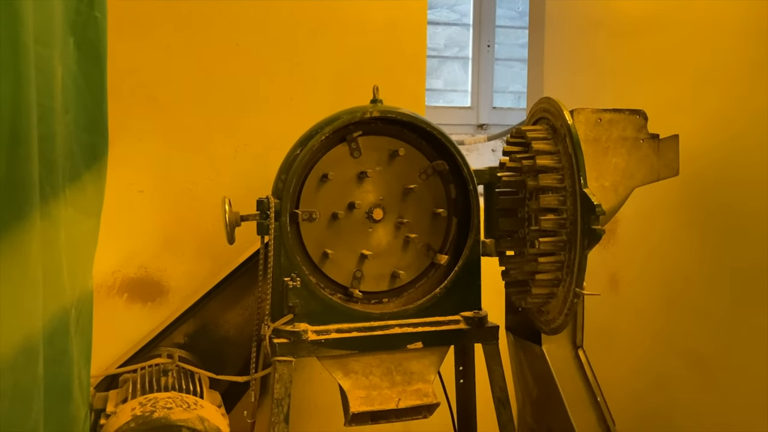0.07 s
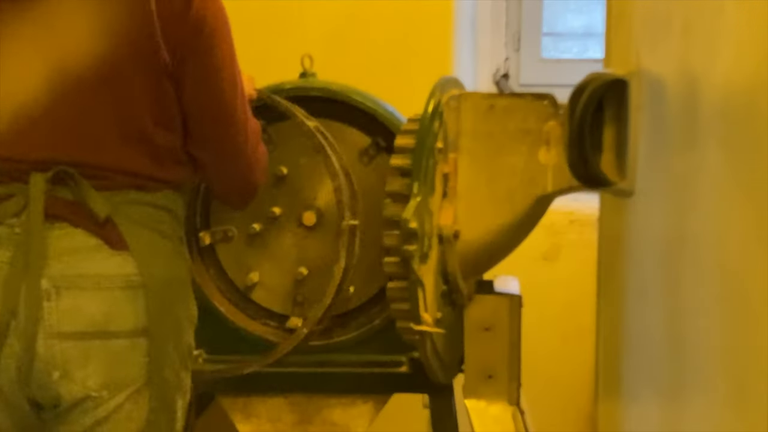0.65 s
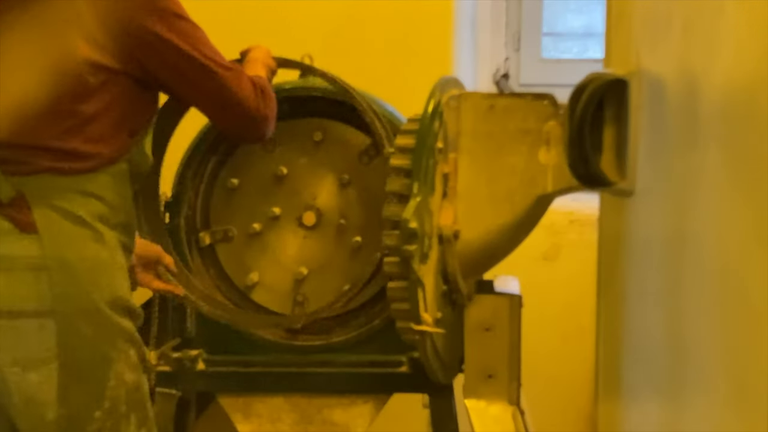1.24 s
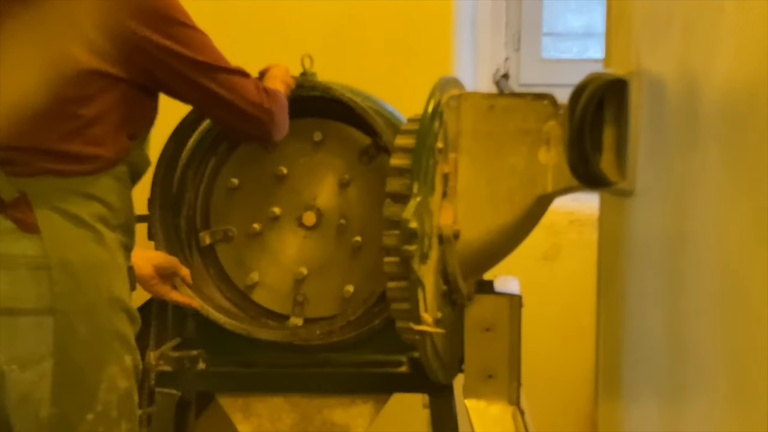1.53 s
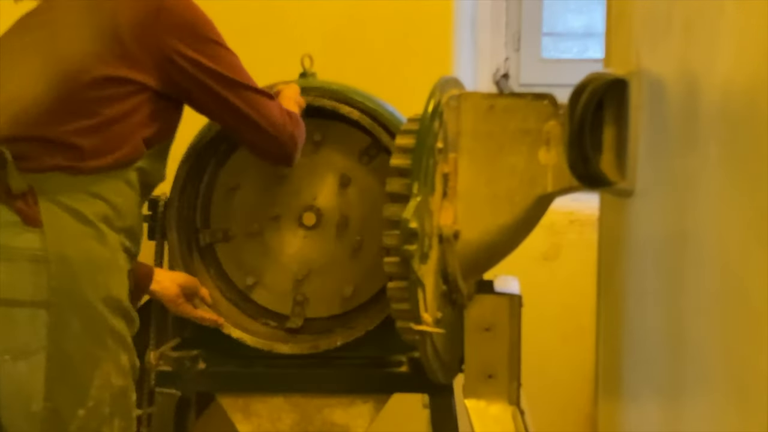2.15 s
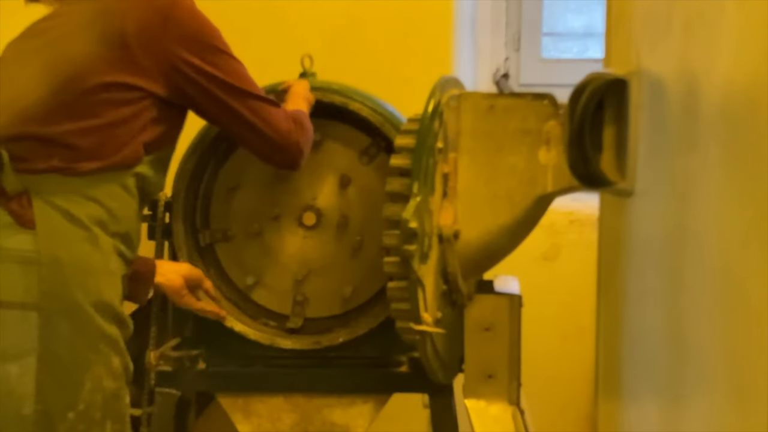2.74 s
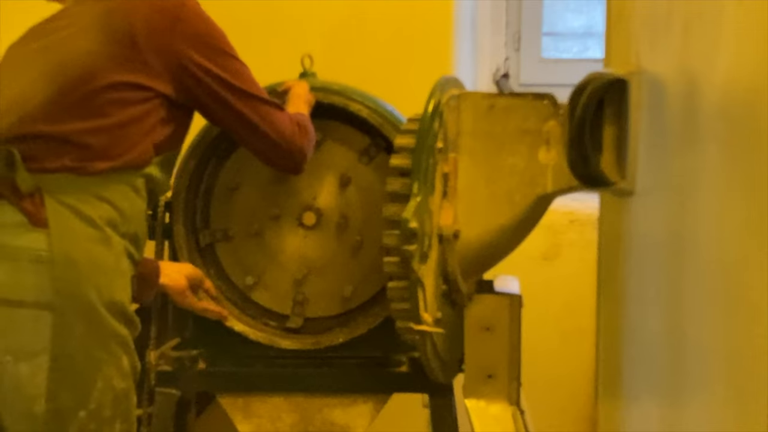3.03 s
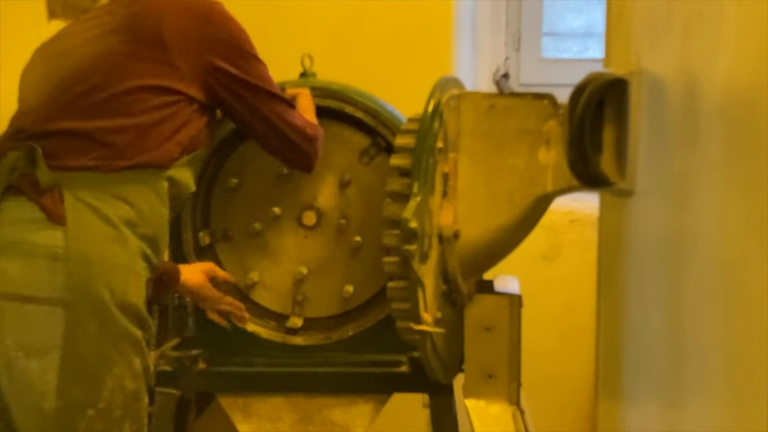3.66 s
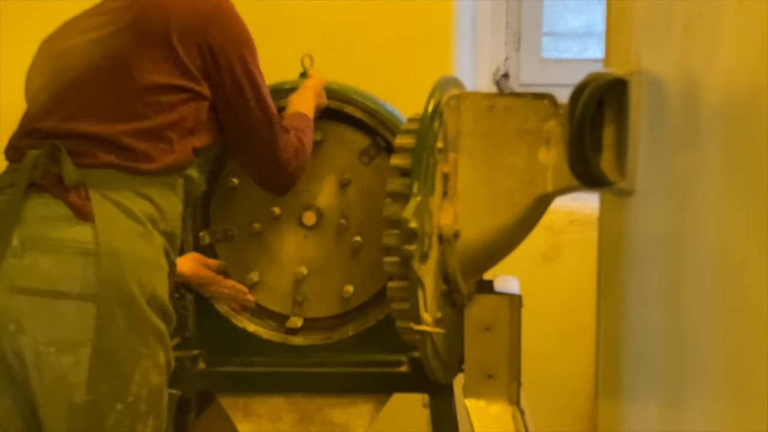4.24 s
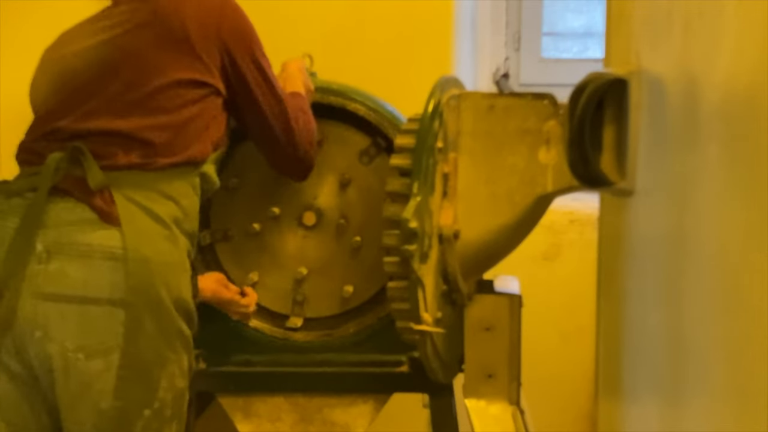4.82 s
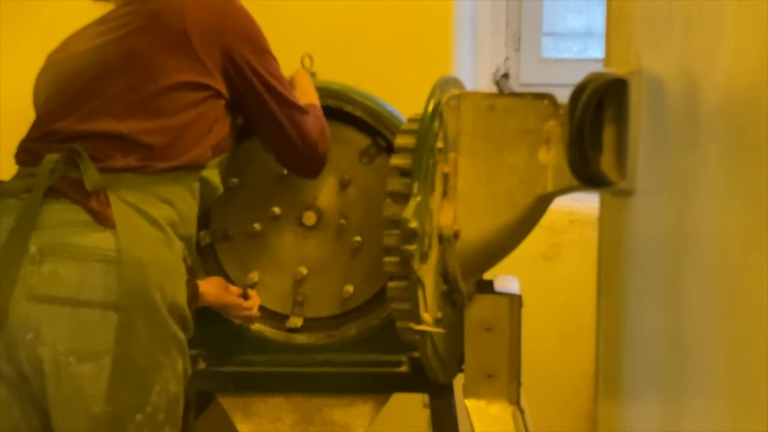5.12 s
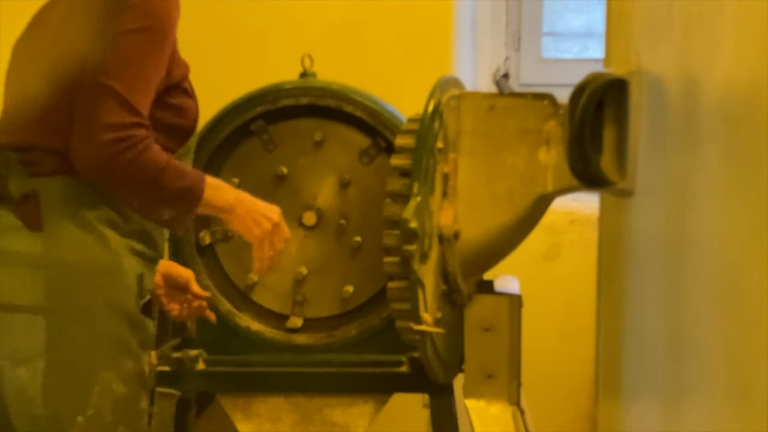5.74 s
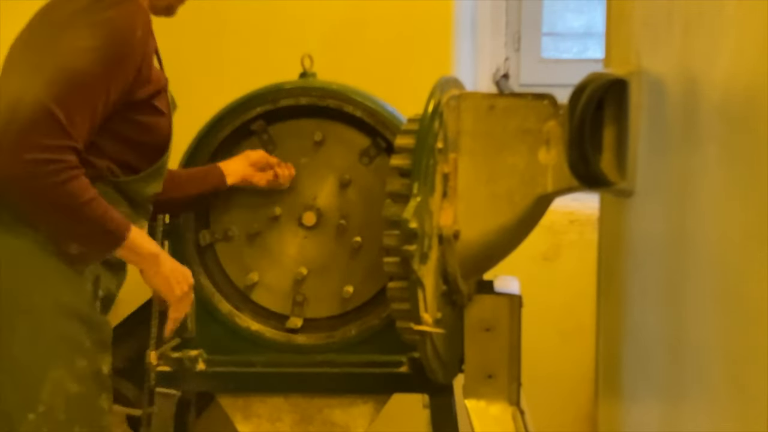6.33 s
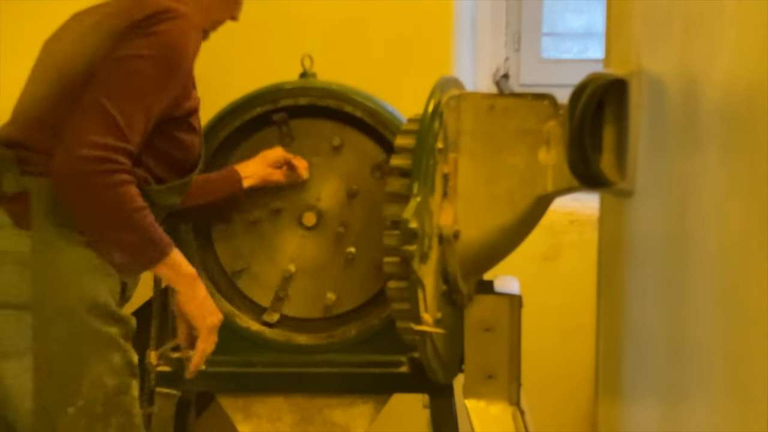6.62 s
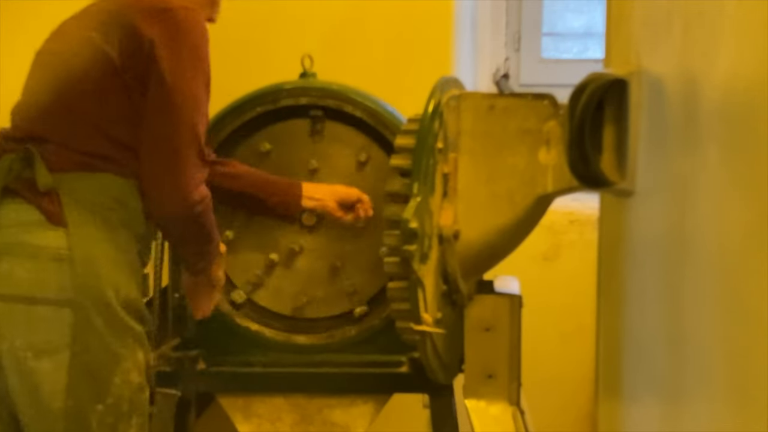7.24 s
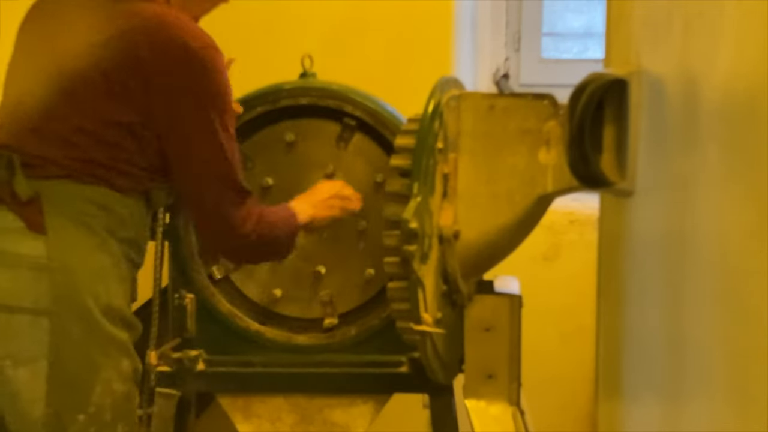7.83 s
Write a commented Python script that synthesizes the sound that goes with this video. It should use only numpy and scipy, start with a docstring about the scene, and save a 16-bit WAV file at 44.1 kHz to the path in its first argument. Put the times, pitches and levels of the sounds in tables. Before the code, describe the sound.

A heavy steel ring is worked into the mouth of a farm mill. First come a soft thud, small ticks and steel rasping on steel, then several uneven groups of loud clanks, each booming and ringing on with a slight shimmer. The ringing fades into quiet rubbing of cloth and hands and a few light clinks. The small workshop adds short reflections over the faint, low hum of a distant motor.

```python
"""Seating a steel ring in a farm mill

A heavy steel ring is pushed home in the mouth of the mill, in a small hard-walled workshop.
Each blow crunches, booms in the housing and leaves the steel ringing and beating, with a late shimmer.
Between the clanks come a dull knock, small ticks, steel rasping on steel and the rub of sleeves
and hands, over the low hum of a distant motor."""
import sys
import numpy as np
from scipy import signal
from scipy.fft import rfft, irfft, next_fast_len
from scipy.io import wavfile

SR = 44100
rng = np.random.default_rng(int(sys.argv[2]) if len(sys.argv) > 2 else 0)


def dump_mix(stems):
    """Bounce the given channels to the path in sys.argv[1] as a 16-bit WAV at rate SR."""
    frames = np.atleast_2d(stems).T  # one column per channel
    limited = np.clip(frames, -1, 1)  # hard clip at full scale
    pcm = np.round(limited * 32767).astype(np.int16)
    wavfile.write(sys.argv[1], SR, pcm)


N = 351477
TIME = np.arange(N) / SR


def amp(db):
    """Decibels to gain."""
    return 10 ** (np.asarray(db) / 20)


def curve_at(points, hz):
    """Interpolates (freq_hz, value) points on a log-frequency axis."""
    point_hz, value = np.transpose(points)
    return np.interp(np.log(hz + 1), np.log(point_hz + 1), value)


def unit_rms(x):
    """Scales to rms 1."""
    return x / np.sqrt(np.mean(x ** 2) + 1e-20)


def add(mix, start_s, sound):
    """Mixes a sound in at start_s."""
    part = mix[..., round(start_s * SR):][..., :sound.shape[-1]]
    part += sound[..., :part.shape[-1]]


def colour(x, spectrum):
    """Filters by (freq_hz, gain_db) points."""
    size = next_fast_len(x.shape[-1])
    gain = amp(curve_at(spectrum, np.fft.rfftfreq(size, 1 / SR)))
    return irfft(rfft(x, size) * gain, size)[..., :x.shape[-1]]


def wander(knots_per_s):
    """Random curve of rms 1."""
    knots = rng.standard_normal(4096)
    return unit_rms(np.interp(TIME * knots_per_s, np.arange(len(knots)), knots))


def swell(t, peak_s, sharpness):
    """Rises softly to 1 at peak_s, then dies away."""
    return (t / peak_s * np.exp(1 - t / peak_s)) ** sharpness


# Likeness of the two microphones: freq_hz, correlation
COHERENCE = [(130, 0.91), (290, 0.81), (450, 0.52), (700, 0.34), (1400, 0.81), (3000, 0.021), (6000, 0),
             (15000, 0.98)]
# Stereo balance: freq_hz, left_minus_right_db
BALANCE = [(300, 0.5), (1000, 1.5), (2200, 2.5), (4500, 0.8), (9000, -1)]
def room_noise(spectrum, size):
    """Coloured noise at two microphones, with the room's coherence and balance."""
    fft_size = next_fast_len(size)
    hz = np.fft.rfftfreq(fft_size, 1 / SR)
    coherence = np.clip(curve_at(COHERENCE, hz), -1, 1)
    pan = amp(curve_at(BALANCE, hz) / 2)
    mid, side = rfft(rng.standard_normal((2, fft_size)))
    mid, side = mid * np.sqrt((1 + coherence) / 2), side * np.sqrt((1 - coherence) / 2)
    pair = np.array([(mid + side) * pan, (mid - side) / pan])
    return irfft(pair * amp(curve_at(spectrum, hz)), fft_size)[:, :size]


def dense_modes(force, bands, size, crunch=0, crunch_s=1):
    """A force rings countless close modes, each band at its own rate; crunch boosts the onset."""
    bands = np.array(bands)
    t, hz = np.arange(size) / SR, np.fft.rfftfreq(size, 1 / SR)
    modes, response = rfft(room_noise(bands[:, :2], size)), 0
    for selector, (_, _, t60_s, rise_s) in zip(np.eye(len(bands)), bands):
        band = irfft(modes * curve_at(np.c_[bands[:, 0], selector], hz), size)
        response += band * np.exp(-np.log(1000) * t / t60_s) * (1 - np.exp(-t / rise_s))
    response *= 1 + crunch * np.exp(-t / crunch_s)
    return signal.fftconvolve(force[None], response, axes=1)[:, :N]


def contact(scrape_s, chatter_s, spectrum, impact, size=6000):
    """A scrape swells into one touch and chatters out. Returns the force and its lead in seconds."""
    t = (np.arange(size) - size // 2) / SR
    pressure = np.exp(-np.where(t < 0, -t / scrape_s, t / chatter_s))
    force = rng.standard_normal(size) * (rng.random(size) < 0.1) * pressure
    force /= np.linalg.norm(force) + 1e-9
    force[size // 2] += impact
    return colour(force / np.linalg.norm(force), spectrum), size // 2 / SR


# Room air spectrum: freq_hz, gain_db
AIR_SPECTRUM = [(30, -25.5), (55, -0.5), (80, -15.5), (125, -22), (200, -12.5), (300, -24.5), (600, -24),
                (1100, -34.5), (2500, -41.5), (6000, -48.5), (16000, -51)]
# Motor tones: pitch_hz, gain_db
HUM_TONES = [(48.6, 0.5), (99.8, -10)]
# Hum envelope: time_s, level_db
HUM_ENVELOPE = [(0, -56.5), (.45, -61), (.6, -54), (4, -48), (7.9, -53.5)]
def workshop(air_db=-58.5, waver_rad=0.15):
    """Still air and the wavering hum of a distant motor."""
    hum = sum(amp(db) * np.sqrt(2) * np.sin(2 * np.pi * hz * TIME + waver_rad * wander(1.5))
              for hz, db in HUM_TONES)
    hum_db = np.interp(TIME, *np.transpose(HUM_ENVELOPE))
    return amp(hum_db) * hum + amp(air_db) * unit_rms(room_noise(AIR_SPECTRUM, N))


# Body rustle spectrum: freq_hz, gain_db
RUSTLE_SPECTRUM = [(50, -15.5), (100, 5.5), (140, -8), (290, 5), (450, -11), (1000, -23), (3000, -36.5)]
# Leans on the machine: centre_s, half_length_s, level_db
WEIGHT_SHIFTS = [(1.12, 0.26, -62.5), (1.95, 0.1, -61), (6.626, 0.08, -56), (7.088, 0.29, -56)]
def shuffling(standing_db=-71, uneven_db=1.5, jolts_per_s=16):
    """A low uneven rustle that swells with each shift of the body."""
    shifts = sum(amp(db) * np.exp(-((TIME - centre_s) / half_s) ** 2)
                 for centre_s, half_s, db in WEIGHT_SHIFTS)
    jolts = amp(uneven_db * wander(jolts_per_s))
    return (amp(standing_db) + shifts) * jolts * unit_rms(room_noise(RUSTLE_SPECTRUM, N))


# Bright resonances of the ring: pitch_hz, width_hz, gain_db
RING_PEAKS = [(1178, 31, 6.5), (1480, 67, -3.5), (1660, 31, 8), (1840, 120, 7), (2060, 300, 1),
              (2430, 230, -5), (3080, 70, -7.5), (4097, 170, -3.5), (7300, 1200, 7.5)]
def steel_ring(drive, gain_db):
    """The ring adds its resonances to whatever shakes it."""
    peaks = sum(amp(db) * signal.lfilter(*signal.iirpeak(hz, hz / width_hz, fs=SR), drive)
                for hz, width_hz, db in RING_PEAKS)
    return drive + amp(gain_db) * peaks


def stroke(length_s, rise_s, sag_db_per_s=6, release_db_per_s=175):
    """A hand gathers speed, slides with easing pressure and lifts off."""
    t = np.arange(SR) / SR
    fall_db = sag_db_per_s * t + release_db_per_s * np.maximum(t - length_s, 0)
    return np.minimum(t / rise_s, 1) * amp(-fall_db)


# Cloth friction spectrum: freq_hz, gain_db
CLOTH_SPECTRUM = [(300, 2), (900, 0), (1350, 0), (1900, -3), (2700, 1), (3600, 2), (5500, -8.5),
                  (7500, -12.5), (12000, -39.5)]
# Fine hiss spectrum: freq_hz, gain_db
HISS_SPECTRUM = [(3000, -31.5), (7000, -7), (12000, 12), (16000, -16.5)]
# Slides of sleeve, hand or ring: start_s, length_s, rise_s, friction_db, hiss_db
RUBS = [(0.482, 0.22, 0.14, -66.5, -67.5), (0.67, 0.15, 0.16, -55.5, -62.5), (1.043, 0.22, 0.046, -60, -65),
        (1.448, 0.028, 0.075, -51.5, -56), (1.616, 0.11, 0.0087, -66.5, -93),
        (1.82, 0.076, 0.05, -62.5, -67), (2.433, 0.13, 0.07, -62.5, -73), (5.431, 0.14, 0.072, -53, -61),
        (5.902, 0.37, 0.035, -63.5, -76), (6.303, 0.081, 0.053, -74, -60), (6.489, 0.31, 0.0066, -50, -56),
        (6.954, 0.12, 0.076, -62, -86), (7.371, 0.053, 0.07, -67.5, -58.5)]
def rubbing(friction_gain_db=3, hiss_gain_db=-2, catch_db=1.1, catches_per_s=110,
            grit_db=-10.5, grit_per_s=130, crackle_db=2.5, crackles_per_s=1500):
    """Cloth and skin slide over the steel; tiny catches and grit stir its resonances."""
    friction_level, hiss_level = np.zeros((2, N))
    for start_s, length_s, rise_s, friction_db, hiss_db in RUBS:
        pressure = stroke(length_s, rise_s)
        add(friction_level, start_s, amp(friction_db + friction_gain_db) * pressure)
        add(hiss_level, start_s, amp(hiss_db + hiss_gain_db) * pressure)
    catches = amp(catch_db * wander(catches_per_s))
    grit = rng.standard_normal((2, N)) * (rng.random(N) < grit_per_s / SR)
    drag = unit_rms(catches * room_noise(CLOTH_SPECTRUM, N))
    drag += amp(grit_db) * unit_rms(colour(grit, CLOTH_SPECTRUM))
    friction = unit_rms(steel_ring(drag, gain_db=-1.5))
    crackle = rng.standard_normal((2, N)) * (rng.random((2, N)) < crackles_per_s / SR)
    hiss = unit_rms(room_noise(HISS_SPECTRUM, N))
    hiss += amp(crackle_db) * unit_rms(colour(crackle, HISS_SPECTRUM))
    return friction_level * friction + hiss_level * unit_rms(catches * hiss)


# Reverberation of light contacts: freq_hz, gain_db, t60_s, rise_s
WALL_BANDS = [(299, -16, .3, 0.0026), (778, -5.5, 0.25, .002), (1500, -1.5, 0.37, 0.00059),
              (3520, 1.5, 0.55, 0.00071), (7000, -2, 0.3, 0.0013), (15420, 1, 0.072, 0.00094)]
# Fingers and loose metal: time_s, tick_db, brightness_db, clink_db
TOUCHES = [(0.807, -50, -47, -37), (1.057, -51, -23, -47), (1.081, -50, -25, -69), (1.468, -48, -6, -63),
           (1.615, -55, -29, -46), (1.828, -54, -11, -62), (1.906, -47.5, -11.5, -39),
           (4.381, -52.5, -4, -47), (4.422, -66, -3, -51), (4.507, -55.5, -8, -56),
           (4.564, -59.5, -3.5, -52.5), (5.924, -55, -24, -53), (5.942, -49.5, -18, -47),
           (6.102, -77, 21, -66.5), (6.445, -53, -5, -64), (6.493, -49, 7.5, -42),
           (6.587, -52.5, 10.5, -41), (6.907, -53.5, -28, -50)]
def ticks(direct_db=22.5, walls_db=-4.5):
    """Sharp touches, too light to move the housing, heard directly and off the walls."""
    force = np.zeros(N)
    for time_s, tick_db, brightness_db, clink_db in TOUCHES:
        spectrum = [(850, clink_db - 10), (1250, clink_db), (2100, tick_db), (6000, tick_db),
                    (11000, tick_db + brightness_db)]
        touch, lead_s = contact(scrape_s=0.00026, chatter_s=0.0021, spectrum=spectrum, impact=0.35)
        add(force, time_s - lead_s, touch)
    walls = dense_modes(steel_ring(force, gain_db=-3.5), WALL_BANDS, size=16384)
    return amp(direct_db) * force + amp(walls_db) * walls


def resonate(x, hz, width_hz):
    """A resonance that follows the curve hz."""
    carrier = np.exp(2j * np.pi * np.cumsum(hz) / SR)
    pole = np.exp(-np.pi * width_hz / SR)
    return 2 * (carrier * signal.lfilter([1 - pole], [1, -pole], x / carrier)).real


# Steel catching on steel: start_s, length_s, first_hz, last_hz, level_db
STEEL_SLIDES = [(0.806, 0.011, 2020, 2180, -50), (0.85, .01, 1830, 1850, -56),
                (1.076, 0.01, 4040, 3850, -52), (1.487, 0.02, 2030, 1800, -57),
                (1.498, 0.013, 3100, 3030, -53), (1.516, .025, 2400, 2300, -60),
                (1.639, 0.0084, 3950, 3950, -64), (1.734, 0.014, 2800, 2600, -65),
                (1.9, 0.016, 3300, 3330, -55.5), (4.66, 0.044, 886, 980, -60),
                (5.939, 0.011, 1920, 2010, -54), (6.24, 0.023, 1920, 2140, -62),
                (6.49, 0.079, 1220, 1330, -53), (6.588, 0.013, 1280, 1480, -47),
                (6.63, 0.13, 1830, 1930, -55), (7.411, 0.078, 2060, 2120, -70)]
def rasps(width_hz=110, lower_ratio=0.65, lower_db=-17, slips_per_s=900, fade_s=0.006, walls_db=-36.5):
    """Quick slips ring the steel at the point of contact; the pitch moves as that point slides."""
    size = 16384
    t, out = np.arange(size) / SR, np.zeros(N)
    for start_s, length_s, first_hz, last_hz, level_db in STEEL_SLIDES:
        hz = np.interp(t, [0, length_s], [first_hz, last_hz])
        slips = rng.standard_normal(size) * (rng.random(size) < slips_per_s / SR)
        slips *= np.exp(-np.maximum(t - length_s, 0) / fade_s)
        slips[0] = 0.95
        tone = resonate(slips, hz, width_hz) + amp(lower_db) * resonate(slips, hz * lower_ratio, width_hz)
        add(out, start_s, amp(level_db) * np.sqrt(length_s * SR) * tone / np.linalg.norm(tone))
    return out + amp(walls_db) * dense_modes(out, WALL_BANDS, size)


# Dull response to a bump: freq_hz, gain_db, t60_s, rise_s
THUD_BANDS = [(40, 13, 0.52, .015), (80.5, 27.5, 0.3, 0.015), (180, 11.5, 0.7, 0.0067),
              (333, 13.5, 0.42, 0.0015), (905, 2, 0.11, 0.0014), (1970, -12, 0.057, .001),
              (8000, -28, 0.079, .001)]
# Soft impacts: start_s, level_db
BUMPS = [(0.694, -28.5), (0.704, -35), (0.723, -34), (0.757, -43.5)]
def knocks():
    """Soft heavy bumps that hardly ring."""
    force = np.zeros(N)
    for start_s, level_db in BUMPS:
        add(force, start_s, amp([level_db]))
    return dense_modes(force, THUD_BANDS, size=24576)


def blow_spectrum(boom_db, clang_db, crack_db, thump_db):
    """Strength of one blow as (freq_hz, level_db) points."""
    return [(80.5, thump_db), (150, boom_db), (268, boom_db), (1310, clang_db),
            (3730, crack_db), (7500, crack_db), (14000, crack_db - 0.5)]


# Blows of steel on steel: time_s, boom_db, clang_db, crack_db, scrape_s, spot_hz, thump_db
STEEL_BLOWS = [(2.009, -22, -41, -55.5, 0.00039, 305, -32.5),
               (2.051, -10, -26.5, -35.5, 0.0027, 290.4, -7.5),
               (2.249, -27.5, -40, -62, 0.0018, 305, -36.5),
               (2.337, -13.5, -34, -44.5, 0.002, 324.7, -10.5), (2.757, -27, -50, -69.5, 0.006, 348, -25.5),
               (2.888, -24, -41, -51, 0.003, 257, -14), (3.140, -29, -62, -69.5, 0.012, 258, -28),
               (3.267, -23.5, -42.5, -44.5, 0.005, 328.8, -27),
               (3.351, -21.5, -47.5, -53, 0.015, 323.3, -29), (3.530, -23.5, -30, -33, 0.0035, 285, -29),
               (3.565, -24, -41.5, -40.5, 0.0062, 279, -25), (3.607, -21.5, -37.5, -35.5, 0.0072, 286, -28),
               (3.6402, -13.5, -27, -33.5, 0.003, 292.2, -16),
               (4.718, -20.5, -29, -51.5, 0.008, 332.7, -33.5), (4.761, -32.5, -35, -40, 0.014, 330, -36),
               (4.787, -17, -20.5, -32, 0.002, 313.6, -16.5), (4.8148, -15.5, -33, -52, 0.002, 317.5, -11),
               (4.990, -23, -28.5, -45.5, 0.006, 327.5, -15.5)]
def flexing(gain_db=1.5):
    """The struck spot bulges and springs back: a short boom at its own pitch."""
    t, out = np.arange(SR) / SR, np.zeros(N)
    bulge = swell(t, peak_s=0.029, sharpness=3)
    for time_s, boom_db, _, _, _, spot_hz, _ in STEEL_BLOWS:
        add(out, time_s, amp(gain_db + boom_db) * bulge * np.sin(2 * np.pi * spot_hz * t))
    return out


# Late high modes: freq_hz, gain_db
SHIMMER_SPECTRUM = [(400, -19.5), (900, -1.5), (1400, 2.5), (1950, -1), (2500, -12.5), (4000, -27),
                    (12000, -43.5)]
def shimmer(gain_db=-39, modes_per_hz=0.13):
    """As in a gong, each boom's energy climbs into many high modes, which bloom after the blow."""
    bloom = swell(np.arange(2 * SR) / SR, peak_s=0.26, sharpness=3.35)
    power = np.zeros(N)
    for time_s, boom_db, *_ in STEEL_BLOWS:
        add(power, time_s, (amp(gain_db + boom_db) * bloom) ** 2)
    size = next_fast_len(N)
    spectrum = rfft(room_noise(SHIMMER_SPECTRUM, N), size)
    is_mode = rng.random(spectrum.shape[-1]) < modes_per_hz * SR / size
    return np.sqrt(power) * unit_rms(irfft(spectrum * is_mode, size)[:, :N])


# Modes of the housing: pitch_hz, gain_db, t60_s
HOUSING_MODES = [(71.06, -23, 1.8), (85.2, -27.5, 1.8), (139.9, -17.5, 1), (162.7, -20, 3.3),
                 (177.8, -24.5, 2.5), (217.3, -19, 0.54), (248, -24, 2.3), (260, -10.5, 1.4),
                 (266.7, -14.5, 1.2), (280, -9, 1.95), (291.4, -10, 0.71), (289.4, -10.5, 1.13),
                 (308.4, -19.5, 2.42), (317.9, -3.5, 0.29), (328, -12.5, 1.5), (329.5, -6, 0.69),
                 (335.3, -15.5, 0.99), (352, -9.5, 0.82), (379, -9, 0.98), (393, -19, 1.3),
                 (427, -14.5, 0.36), (455, -23, 1.7), (509.5, -18.5, 0.98), (602, -19, 1.45),
                 (670, -16, 0.89), (721, -9.5, 0.45), (958, -13, 0.55), (1152, -13.5, 0.32)]
def housing(gain_db=-2.5, rise_s=0.0032, scatter_db=4.5, favour_db=4.5, favour_width_hz=28, spread=0.44):
    """Each blow rings the same modes, favouring those near its spot's pitch; close modes beat."""
    hz, mode_db, t60_s = np.transpose(HOUSING_MODES)
    t, out = np.arange(round(2.5 * SR)) / SR, np.zeros((2, N))
    polarity = (-1) ** np.arange(len(hz))  # neighbours start opposed, so the boom swells
    envelope = np.exp(-np.log(1000) * t / t60_s[:, None]) * (1 - np.exp(-t / rise_s))
    # Short waves meet the microphones out of step.
    offset_rad = polarity * spread * np.arccos(np.clip(curve_at(COHERENCE, hz), -1, 1)) / 2
    phase = 2 * np.pi * hz[:, None] * t
    modes = np.array([envelope * np.sin(phase + side * offset_rad[:, None]) for side in (1, -1)])
    for time_s, boom_db, clang_db, crack_db, _, spot_hz, thump_db in STEEL_BLOWS:
        drive_db = curve_at(blow_spectrum(boom_db, clang_db, crack_db, thump_db), hz)
        drive_db += favour_db * np.exp(-((hz - spot_hz) / favour_width_hz) ** 2)
        drive_db += scatter_db * rng.standard_normal(len(hz))
        add(out, time_s, (polarity * amp(gain_db + mode_db + drive_db)) @ modes)
    return out


# Crowded upper modes and the room's answer: freq_hz, gain_db, t60_s, rise_s
CLANG_BANDS = [(60, -9, 0.9, 0.012), (150.8, 4.5, 0.58, 0.0057), (296, 14.5, 1, 0.0094),
               (502, 14, 0.49, 0.0018), (850, 13, 0.39, 0.0014), (1040, 18.5, 0.28, 0.002),
               (1620, 6.5, 0.36, 0.00087), (3340, 13, 0.3, 0.00083), (5100, 0, 0.31, .001),
               (7300, -4, 0.24, 0.00028), (15000, -19, 0.29, 0.00066)]
# Long dark aftersound of the machine: freq_hz, gain_db, t60_s, rise_s
TAIL_BANDS = [(70, -16.5, 7.5, 0.017), (120, -13, 2.9, 0.022), (194, -14.5, 3.4, 0.067),
              (270, 2.5, 1.68, 0.025), (554, -4.5, 1.61, 0.027), (1100, -2, 0.8, 0.05),
              (5000, -26.5, 0.6, 0.05)]
def clanks(direct_db=16.5, tail_db=4):
    """Blows crack and crunch, each on a new spot with its own upper modes; the machine sounds on."""
    force, clang = np.zeros(N), np.zeros((2, N))
    for time_s, boom_db, clang_db, crack_db, scrape_s, _, thump_db in STEEL_BLOWS:
        chatter_s = 0.0055 + 0.61 * scrape_s  # glancing blows chatter longer
        spectrum = blow_spectrum(boom_db, clang_db, crack_db, thump_db)
        touch, lead_s = contact(scrape_s, chatter_s, spectrum, impact=0.32)
        add(force, time_s - lead_s, touch)
        ringing = steel_ring(touch, gain_db=-7.5)
        upper_modes = dense_modes(ringing, CLANG_BANDS, size=32768, crunch=0.77, crunch_s=0.011)
        add(clang, time_s - lead_s, upper_modes)
    return amp(direct_db) * force + clang + amp(tail_db) * dense_modes(force, TAIL_BANDS, size=98304)


def scene():
    """All sources at the two microphones."""
    blows = housing() + flexing() + clanks() + shimmer()
    handling = knocks() + ticks() + rubbing() + rasps() + shuffling()
    return blows + handling + workshop()


def record(dry, right_delay_samples=4, low_cut_hz=37, ceiling=0.8, high_cut_hz=15900):
    """Right-channel delay, rumble filter, soft peak limit and band limit."""
    pair = np.array([dry[0], np.pad(dry[1], (right_delay_samples, 0))[:N]])
    pair = signal.sosfilt(signal.butter(5, low_cut_hz, "high", fs=SR, output="sos"), pair)
    pair = pair / (1 + (pair / ceiling) ** 8) ** (1 / 8)
    lowpass = signal.firwin(511, high_cut_hz, window=("kaiser", 9), fs=SR)
    return signal.oaconvolve(pair, lowpass[None], "same")


dry = scene()
out = record(dry)
dump_mix(out)
```